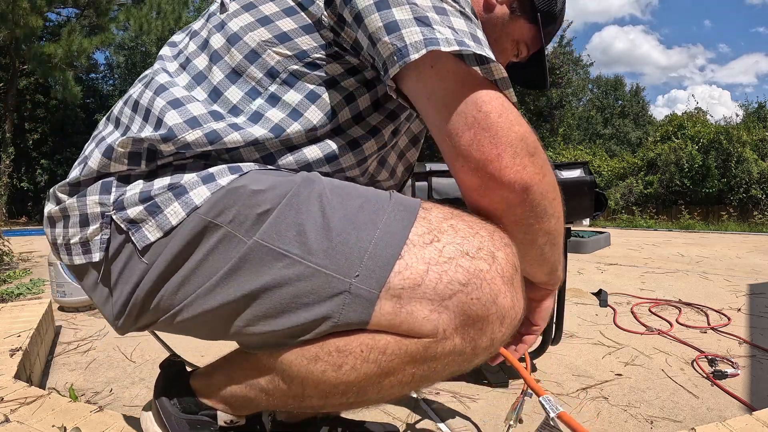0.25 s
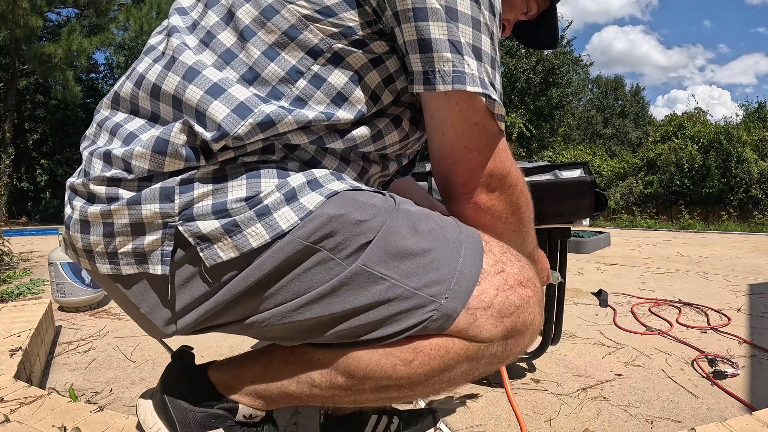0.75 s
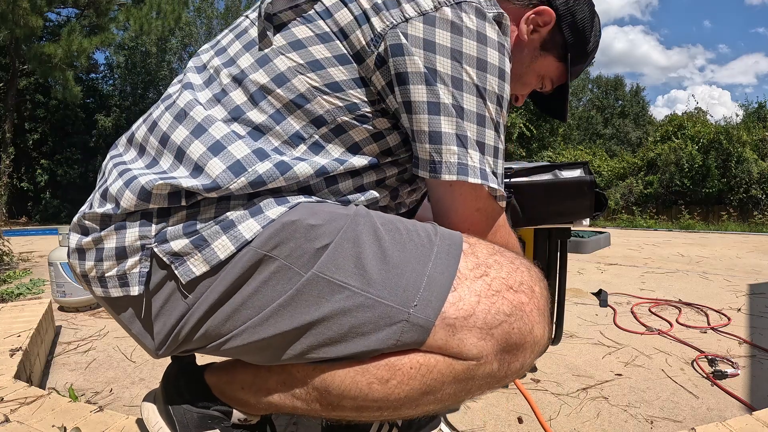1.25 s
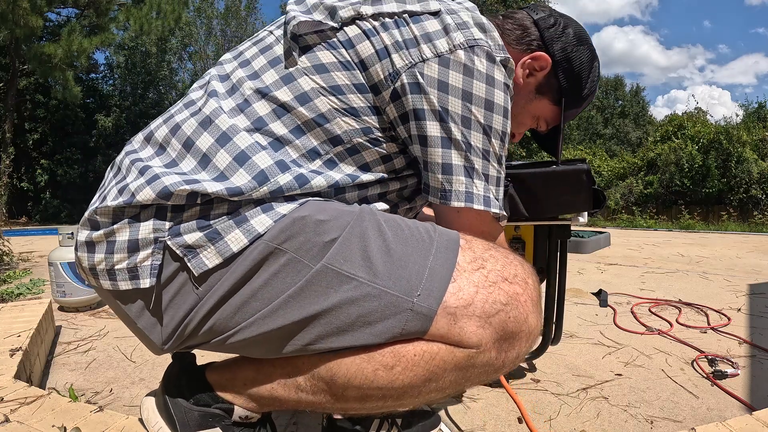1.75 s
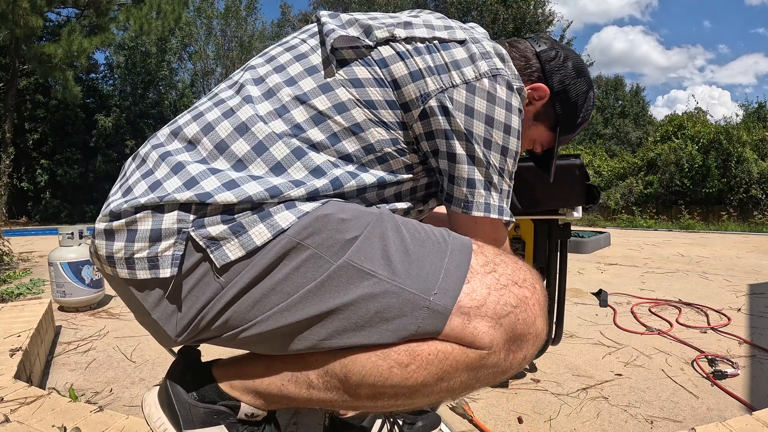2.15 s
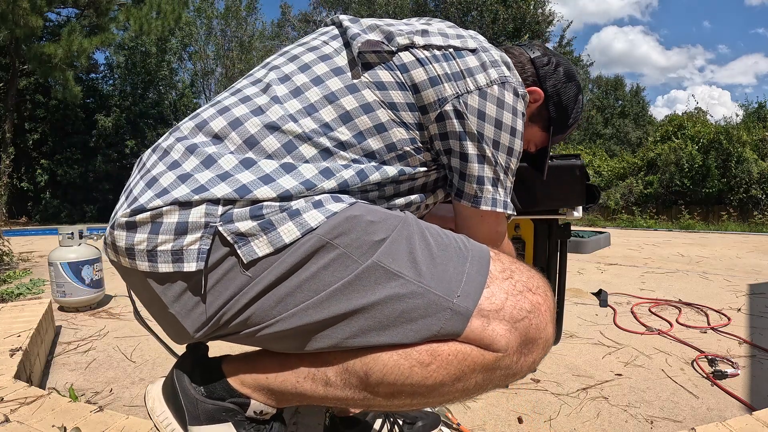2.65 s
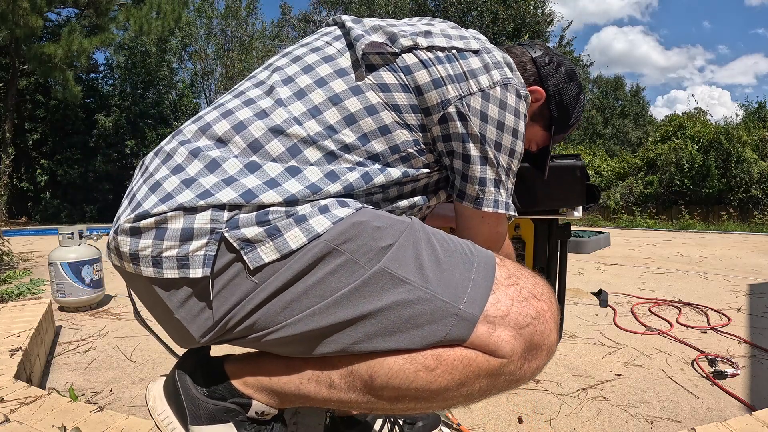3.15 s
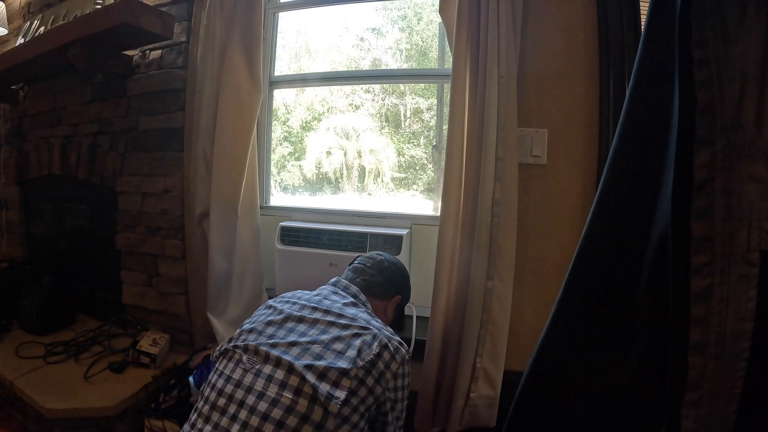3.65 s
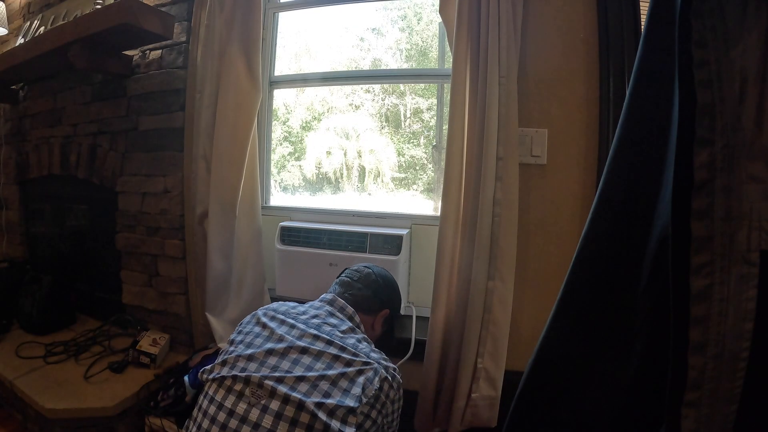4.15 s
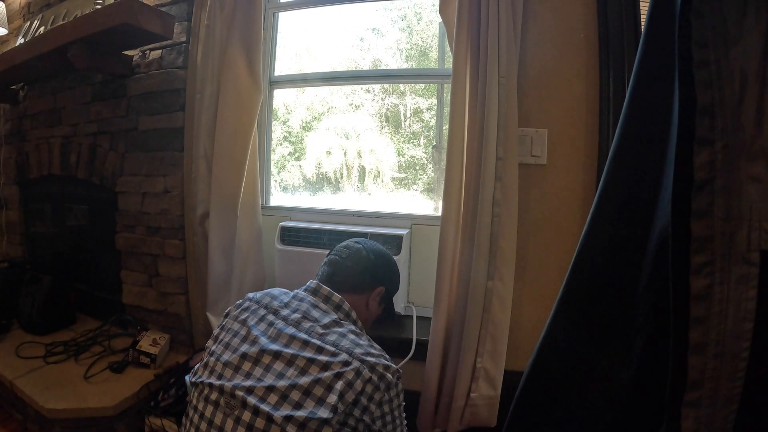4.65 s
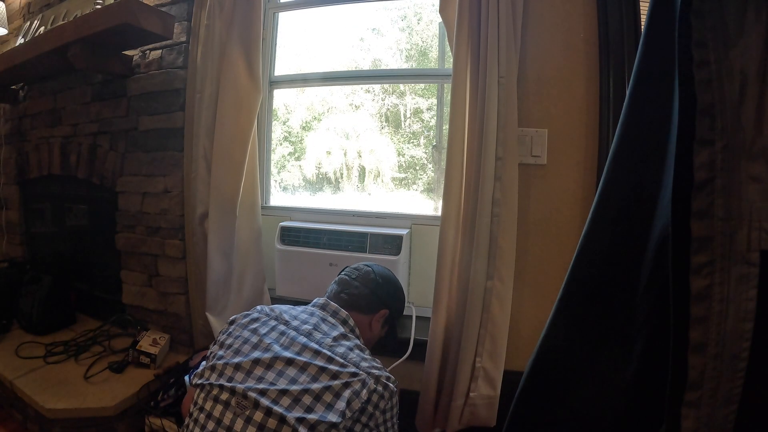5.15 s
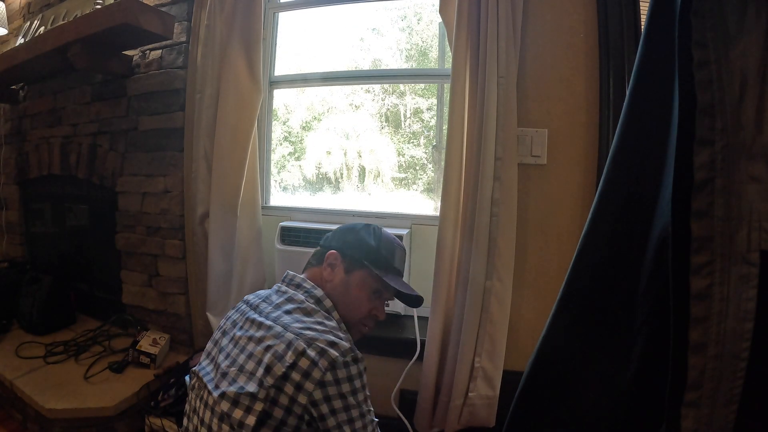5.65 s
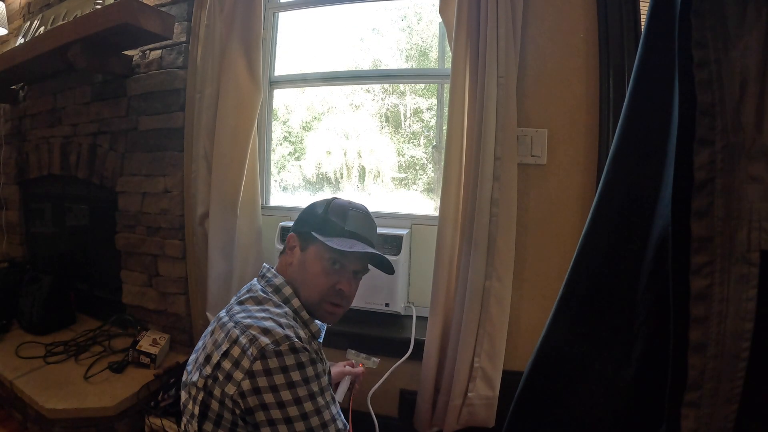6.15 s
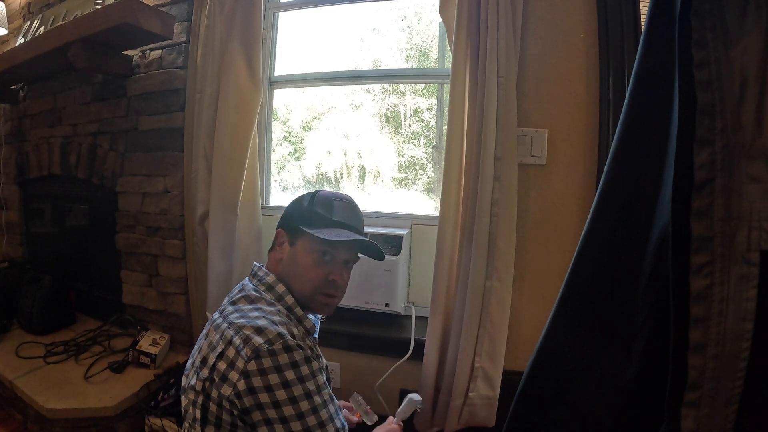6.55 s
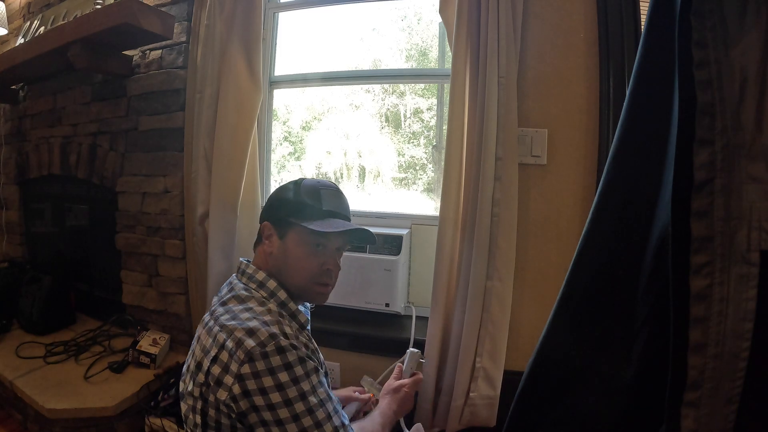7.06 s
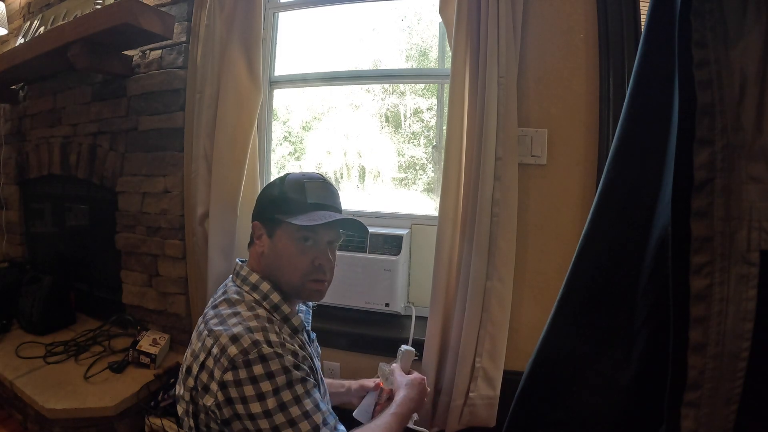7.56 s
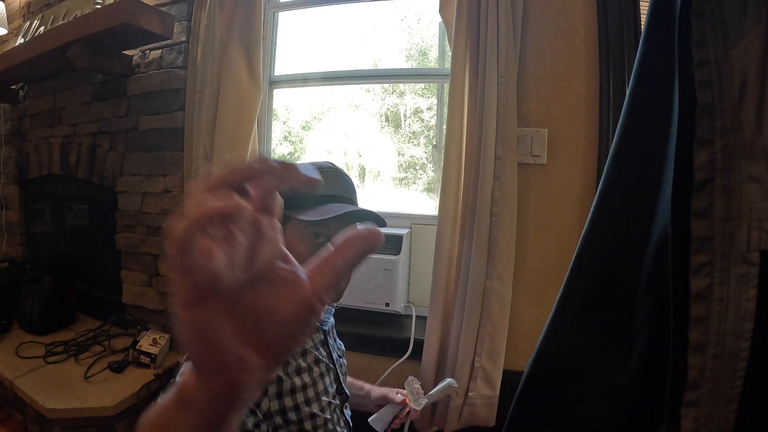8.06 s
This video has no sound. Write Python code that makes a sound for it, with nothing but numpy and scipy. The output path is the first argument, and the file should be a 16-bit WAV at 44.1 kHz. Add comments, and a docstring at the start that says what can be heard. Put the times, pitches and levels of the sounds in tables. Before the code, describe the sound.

Outdoors on a concrete patio, a single-cylinder generator runs steadily at arm's length, a loud, bright, rattling roar over a fast low exhaust throb. After three seconds it cuts off. Following a tiny gap, the same engine drones dully and much quieter through a window, while a plug and cable knock and drag on the floor, then small plastic ticks and faint cloth rustles. A small camera's close stereo microphones hear it.

```python
"""First a single-cylinder four-stroke generator runs steadily at arm's length on a concrete patio: waves at
multiples of its firing rate make the exhaust note, and noise rung through resonances makes the roar.
After a short gap it is heard from indoors through a window, duller and quieter. A plug and cable knock (fading
tones and noise) and drag (lumpy noise) on the floor; plastic ticks (noise bursts) and cloth rustles (grainy
treble). A small camera with two close microphone ports listens."""
import sys
import numpy as np
from scipy import signal
from scipy.fft import rfft, irfft
from scipy.io import wavfile
from scipy.ndimage import uniform_filter1d

SR = 44100
rng = np.random.default_rng(int(sys.argv[2]) if len(sys.argv) > 2 else 0)


def put_to_file(sound):
    """Save the sound as 16-bit audio at rate SR, in the file named by the first command-line argument."""
    columns = np.atleast_2d(sound).T  # one column per channel
    safe = np.clip(columns, -1, 1)
    whole_steps = np.round(safe * 32767)
    wavfile.write(sys.argv[1], SR, whole_steps.astype(np.int16))


N = 365588
TIME = np.arange(N) / SR  # s
BINS = np.arange(N // 2 + 1) * SR / N + 1e-3  # Hz, just above zero so that its logarithm exists


# engine speed on the patio: (time [s], firing rate [firings per s])
PATIO_SPEED = [(0.32, 30.58), (0.72, 30.55), (1.12, 30.5), (1.52, 30.49), (1.92, 30.55), (2.32, 30.68),
               (2.72, 30.61)]
# exhaust note, one row for each multiple 1, 2, 3, .. of the firing rate: (level [dB])
PATIO_NOTE = [-6, -0.5, -12, 1, 2.5, -30, 3, -0.5, -11.5, -9.5, -24, -9.5, -10, -18.5, -22, -16.5, -11.5,
              -50, -53, -18, -16.5, -12, -8, -16, -32, -26, -16, -25.5, -49, -17, -21.5, -48, -46, -16.5,
              -38, -22, -24.5, -27.5, -41, -18, -47, -52, -49, -30, -47, -19.5]
# thin panels that sing when a multiple meets them: (pitch [Hz], width [Hz], boost [dB])
PATIO_WHINES = [(1344.8, 4.4, 19.7)]
# tone of the roar of gas, cooling fan and shaking metal: (frequency [Hz], level [dB])
PATIO_ROAR = [(8, -39.5), (30, -13), (150, -4), (350, -0.5), (900, -14), (2400, -15), (4000, -19.5),
              (8000, -27.5), (11500, -34.5), (14500, -49.5)]
# frame, tank and muffler resonances in the roar: (pitch [Hz], width [Hz], boost [dB])
PATIO_PANELS = [(415, 126, 3), (714, 62, 9), (1064, 330, 11), (1415, 98, 6.5), (1910, 200, 7.5),
                (2740, 380, 6.5), (3550, 150, 2), (5170, 460, 5), (7230, 920, 5.5)]
# strength of the left-right difference: (frequency [Hz], level [dB])
PATIO_SIDE = [(60, -47), (110, -42), (200, -20), (370, -23), (600, -5), (800, -4.5), (1260, -6.5),
              (2320, -6.5), (4270, -6.5), (8500, -11), (12000, -2)]
# balance between the ports: (frequency [Hz], left minus right [dB])
PATIO_BALANCE = [(250, 0), (690, 0), (1260, -3), (2320, -1.5), (4270, 0), (7850, -0.5), (14400, 3.5)]


def engine_near():
    """The generator beside the camera: two pulses per cycle and a roar, both close and bright."""
    speed = curve(PATIO_SPEED)
    turns = np.cumsum(speed) / SR
    note = exhaust(turns + 0.557, PATIO_NOTE, angle=-0.68, sweep=0.02005, second=1.16, gap=0.238,
                   waver_db=2.5, smear=0.85, firm=16.6, sings=singing(speed, PATIO_WHINES))
    noise = roar(turns - 0.23, PATIO_ROAR, PATIO_PANELS, throb_db=0.4, puff_db=2.0, grain_db=2.5, gear_db=-6.5)
    both = undb(-21.5) * note + undb(-10.5) * noise
    return ports(both, PATIO_SIDE, lead=-0.15, scatter_s=0.75, left=PATIO_BALANCE)


# engine speed heard indoors: (time [s], firing rate [firings per s])
ROOM_SPEED = [(3.66, 30.82), (4.06, 30.78), (4.46, 30.85), (4.86, 30.85), (5.26, 30.77), (5.66, 30.62),
              (6.06, 30.54), (6.46, 30.72), (6.86, 30.85), (7.26, 30.72), (7.5, 30.69), (8.0, 30.83)]
# exhaust note, one row for each multiple 1, 2, 3, .. of the firing rate: (level [dB])
ROOM_NOTE = [0, -17, -8, 0, 1.5, -24.5, -6.5, -19, -15, -17.5, -15, -16, -32, -46, -25.5, -16.5, -51, -38,
             -41, -26, -52, -23, -44, -22.5, -23, -34, -24.5, -42, -43, -23.5, -24, -38, -29.5, -51, -31,
             -24, -29, -41, -27, -20]
# narrow resonances of the room (near 340 Hz) and of panels that sing when a multiple meets them: (pitch [Hz],
# width [Hz], boost [dB])
ROOM_WHINES = [(339.9, 4.2, 9.6), (758, 6.4, 31), (1211, 8.1, 11)]
# tone of the roar through wall and window: (frequency [Hz], level [dB])
ROOM_ROAR = [(8, -27), (22, -5), (30, -1), (60, 3), (130, -16.5), (330, -5), (600, -12.5), (1300, -16),
             (2500, -26.5), (4000, -36.5), (8000, -45), (11000, -56.5), (13000, -58), (13900, -67)]
# resonances in the roar: (pitch [Hz], width [Hz], boost, or cut if negative [dB])
ROOM_PANELS = [(513, 29, -9), (780, 45, 3), (943, 19, 7.5), (1220, 42, 8), (2010, 88, 3.5),
               (2720, 170, 1.5), (12400, 740, 4)]
# gain of the roar: (time [s], level [dB])
ROOM_ROAR_GAIN = [(3.4, -22), (4.8, -23), (6.2, -22.5), (7.2, -22), (8.2, -20.5)]
# strength of the left-right difference, also for the handling sounds: (frequency [Hz], level [dB])
ROOM_SIDE = [(110, -76), (200, -44), (370, -6), (690, 4.5), (1260, 8), (2320, 10.5), (4270, 11.5),
             (7850, 10), (14400, -1)]


def engine_far():
    """The generator through wall and window: one pulse per firing and a duller, quieter roar."""
    speed = curve(ROOM_SPEED)
    turns = np.cumsum(speed) / SR
    note = exhaust(turns + 0.041, ROOM_NOTE, angle=4.21, sweep=0.02524, second=0, gap=0,
                   waver_db=1.35, smear=0.68, firm=11.4, sings=singing(speed, ROOM_WHINES))
    noise = roar(turns - 0.25, ROOM_ROAR, ROOM_PANELS, throb_db=0.4, puff_db=-1.5, grain_db=0.0, gear_db=-4.5)
    both = undb(-36.5) * note + undb(curve(ROOM_ROAR_GAIN)) * noise
    return ports(both, ROOM_SIDE, lead=0.05, scatter_s=0.55)


def exhaust(turns, note, angle, sweep, second, gap, waver_db, smear, firm, sings):
    """A pulse per firing, highs first, and a duller second pulse a share of the cycle later."""
    out = 0
    stroke = wander(30.0, lambda v: undb(0.24 * v))  # the whole note varies a little
    for k, level_db in enumerate(note, 1):
        loose = min((k / firm) ** 2, 1)  # high multiples waver more
        gain = wander(5.0, lambda v: undb(level_db + waver_db * loose * v))
        second_gain = second / (1 + (k / 17.0) ** 4)  # fades above multiple 17
        pair = np.angle(1 + second_gain * np.exp(-2j * np.pi * k * gap))  # only the phase is used
        phase = 2 * np.pi * k * turns + angle + sweep * k ** 2 + pair
        phase = phase + smear * loose * wander(2.977)
        out = out + gain * sings(k) * np.cos(phase)
    return stroke * out


def singing(speed, whines):
    """A multiple grows louder while its pitch is inside a narrow resonance."""
    def gain(k):
        pitch, reach = k * speed, speed.mean() / 2
        # only the multiple nearest to a resonance makes it sing
        return undb(sum(db / (1 + (2 * (pitch - hz) / width) ** 2) for hz, width, db in whines
                        if abs(pitch.mean() - hz) < reach))
    return gain


def roar(turns, tone, panels, throb_db, puff_db, grain_db, gear_db):
    """Noise rung through panels: it throbs once a cycle, most in the treble, which the valves make gritty."""
    beat = np.cos(2 * np.pi * turns)
    steady = rng.standard_normal(N) * undb(throb_db * beat + 0.27 * wander(9.0) + 0.64 * wander(180.0))
    rattle = rng.standard_normal(N) * undb(puff_db * beat + grain_db * wander(250.0) + 0.5 * wander(13.0))
    # cam, gears and valves clatter in the same pattern on every cycle
    pattern = rng.standard_normal(720)
    gears = np.interp(turns, np.arange(len(pattern)) / len(pattern), pattern, period=1)
    gears = gears * undb(gear_db + 1.3 * wander(20.0))
    middle = rfft(steady) + rfft(gears) / (1 + (1400 / BINS) ** 8)
    # the rattle takes over above about 5500 Hz
    treble = 1 / (1 + (5500 / BINS) ** 4)
    mix = middle * np.sqrt(1 - treble) + rfft(rattle / rattle.std()) * np.sqrt(treble)
    ring_db = sum(db / (1 + (2 * (BINS - hz) / width) ** 2) for hz, width, db in panels)
    rung = irfft(mix * undb(ring_db), N)
    return colour(sway(rung, panels, sway_db=1.0, drift=0.025), tone)


def sway(x, panels, sway_db, drift):
    """Each panel swells and slides in pitch a little on its own as the frame shakes."""
    bins, times, frames = signal.stft(x, SR, nperseg=2048)
    at = np.minimum((times * SR).astype(int), N - 1)
    db = 0
    for hz, width, _ in panels:
        swell = sway_db * wander(14.0)[at]
        centre = hz * (1 + drift * wander(2.4)[at])
        db = db + swell / (1 + (2 * (bins[:, None] - centre) / width) ** 2)
    return signal.istft(frames * undb(db), SR, nperseg=2048)[1][:N]


# plug and cable knocks on the floor; ring and ping levels are against the thump:
# (time [s], blow level [dB], thump pitch [Hz], ring level [dB], ping pitch [Hz], ping level [dB])
FLOOR_KNOCKS = [(3.463, -37.5, 328, 9, 3200, -25), (4.031, -24.5, 380, -14, 730, -16),
                (4.054, -21.5, 388, -13, 1130, -5), (4.081, -32, 300, -12, 813, -14),
                (4.122, -30, 550, 3, 2950, -16), (4.155, -25, 344, -7, 1150, -7),
                (4.189, -17.5, 345, -7, 3500, -23), (4.218, -18, 400, -20, 800, -18),
                (4.238, -22, 443, -18, 780, -14), (4.28, -29, 388, -12, 1010, -14),
                (4.308, -36, 326, -19, 711, -14), (4.719, -29, 380, -7, 790, -10),
                (5.124, -35.5, 380, 12, 3180, -4), (5.273, -33, 336, -14, 470, -10),
                (5.328, -27, 350, -9, 480, -8), (5.356, -35, 231, 6.5, 1250, -7),
                (6.559, -28, 302, 12.5, 2720, -15), (6.564, -16, 239, -13, 1690, -17),
                (6.576, -27, 330, -3, 700, -8), (7.491, -27, 248, -9, 620, -3.5)]
# the plug's ring, before each blow varies it: (pitch [Hz], level [dB], time to fall 60 dB [s])
PLUG_MODES = [(890, 0, 0.022), (1255, -10, 0.016), (1610, -25, 0.016)]


def knocks():
    """A dull thump with a noisy tail, the plug's short ring, a bright ping and a rattling crack."""
    out, t = np.zeros(N), np.arange(4000) / SR
    tails, cracks = band(410.0, 380.0), band(950.0, 1230.0)
    # each blow lands on another spot, which changes the ring's loudness and pitch
    spots = rng.standard_normal((len(FLOOR_KNOCKS), len(PLUG_MODES), 2))
    for (s, blow_db, hz, ring_db, ping_hz, ping_db), spot in zip(FLOOR_KNOCKS, spots):
        now = slice(int(s * SR), int(s * SR) + len(t))
        thump = np.sin(2 * np.pi * hz * t) * undb(-60 * t / 0.049) * np.minimum(t / 0.0026, 1)
        tail = 0.33 * tails[now] * undb(-60 * t / 0.05)
        plug = 0
        for (mode_hz, db, t60), (louder, higher) in zip(PLUG_MODES, spot):
            fade = undb(ring_db + db + 1.2 * louder - 60 * t / t60)
            plug = plug + fade * np.sin(2 * np.pi * mode_hz * (1 + 0.015 * higher) * t)
        crack = cracks[now] * undb(ring_db - 11 - 60 * t / 0.035)
        ping = np.sin(2 * np.pi * ping_hz * t) * undb(ping_db - 60 * t / 0.021)
        onset = np.minimum(t / 0.0013, 1)
        out[now] += undb(blow_db) * (thump + tail + plug + crack + ping) * onset
    return out


# tugs on the cable: (time [s], length [s], rumble level [dB], scrape level against rumble [dB])
CABLE_TUGS = [(4.02, 0.13, -40, -3.5), (4.168, 0.17, -39.5, -17), (5.013, 0.35, -42, -9.5),
              (6.552, 0.07, -42.5, 0)]


def drags():
    """The cable judders over the floor: low noise in uneven lumps, with a rough scrape above."""
    lumps = undb(3.2 * wander(70.0))
    rumble = lumps * band(333.0, 196.0)
    scrape = lumps * undb(1.6 * wander(90.0)) * band(530.0, 1150.0)
    out = 0
    for s, length, level_db, scrape_db in CABLE_TUGS:
        tug = gesture(s, length, level_db, attack_s=0.015, t60_s=1)
        out = out + tug * (rumble + undb(scrape_db) * scrape)
    return out


# small dry ticks of plastic; the top is the noise near 11.5 kHz, against the main band:
# (time [s], level [dB], main band [Hz], top level [dB])
PLASTIC_TICKS = [(5.3694, -62, 6000, -13), (5.5794, -58, 6000, -11), (5.9374, -57.5, 6000, -23),
                 (5.9844, -59.5, 7500, -16), (6.0072, -54, 6500, -10), (6.2307, -57.5, 4500, -17),
                 (6.2507, -59, 8000, -9), (6.3165, -57, 7000, -19), (6.3344, -52, 4000, -25),
                 (6.444, -54, 6960, -29), (6.5585, -45, 4000, -33), (6.7035, -44, 5800, -23),
                 (7.182, -55, 7000, -22)]


def ticks():
    """Each tick is a 20 ms burst of fading noise, about an octave wide, with some very high noise."""
    out, t = np.zeros(N), np.arange(900) / SR
    bursts, high = rng.standard_normal((len(PLASTIC_TICKS), len(t))), band(11500.0, 2500.0)
    for (s, level_db, hz, top_db), burst in zip(PLASTIC_TICKS, bursts):
        now = slice(int(s * SR), int(s * SR) + len(t))
        octave = signal.butter(2, [hz / 1.8, hz * 1.23], "band", fs=SR, output="sos")
        low = signal.sosfilt(octave, burst)
        out[now] += undb(level_db - 60 * t / 0.034) * (low / low.std() + undb(top_db) * high[now])
    return out


# cloth movements: (time [s], length [s], level [dB])
CLOTH_MOVES = [(4.128, 0.1, -62), (7.95, 0.18, -62.5), (8.14, 0.15, -60.5)]


def rustle():
    """Cloth rustles as soft treble noise whose level flickers in fine grains."""
    moving = sum(gesture(*row, attack_s=0.14, t60_s=0.3) for row in CLOTH_MOVES)
    grain = undb(1.9 * wander(90.0) + 1.6 * wander(25.0))
    return moving * grain * (band(4800.0, 3800.0) + 0.14 * band(12000.0, 1500.0))


def ports(mid, side, lead, scatter_s, left=((1, 0), (2, 0))):
    """Left and right from one sound: direction sets balance and lead, reflections scatter the rest."""
    t = np.arange(SR) / SR
    echoes = rfft(rng.standard_normal(SR) * undb(-60 * t / scatter_s), N)
    gain = undb(over_bins(left))
    balance = (gain - 1) / (gain + 1)
    # reflections part the two ports above about 500 Hz
    scatter = 0.78 * echoes / np.abs(echoes) / np.sqrt(1 + (500.0 / BINS) ** 2)
    spread = balance + undb(over_bins(side)) * (1j * lead + scatter)
    wide = irfft(rfft(mid) * spread, N)
    return np.array([mid + wide, mid - wide])


def gesture(start_s, length_s, level_db, attack_s, t60_s):
    """A movement's loudness: a straight rise, a hold, and a fade that begins length_s after the start."""
    fade_time = np.maximum(TIME - start_s - length_s, 0)
    return ramp(start_s, attack_s) * undb(level_db - 60 * fade_time / t60_s)


def wander(rate, shape=lambda v: v):
    """Random levels held 1 / rate s and smoothed twice, spread near 1, then passed through shape."""
    step = 32  # samples between computed points
    k, count = max(int(SR / step / rate), 1), N // step + 2
    held = np.repeat(rng.standard_normal(count // k + 1), k)[:count]
    smooth = uniform_filter1d(uniform_filter1d(held, k), k)
    return np.interp(np.arange(N), step * np.arange(count), shape(1.18 * smooth))


def band(hz, width):
    """Noise of rms 1 around a centre frequency."""
    x = irfft(rfft(rng.standard_normal(N)) / (1 + ((BINS - hz) / width) ** 4), N)
    return x / x.std()


def colour(x, table):
    """Make each frequency louder or softer by (frequency [Hz], level [dB]) points."""
    return irfft(rfft(x) * undb(over_bins(table)), N)


def over_bins(table):
    """Read (frequency [Hz], value) points at every frequency, straight over log frequency."""
    hz, value = np.transpose(table)
    return np.interp(np.log(BINS), np.log(hz), value)


def curve(table):
    """Straight lines in time through (time [s], value) points."""
    table = np.asarray(table)
    return np.interp(TIME, table[:, 0], table[:, 1])


def ramp(start_s, rise_s):
    """0 before the start, 1 after the rise."""
    return np.clip((TIME - start_s) / rise_s, 0, 1)


def undb(db):
    """Turn a level in dB into a gain."""
    return 10 ** (np.asarray(db) / 20)


# left-right difference indoors, first narrow and then wider: (time [s], level [dB])
ROOM_WIDTH = [(4.9, -41), (5.8, -34), (6.15, -19.5), (6.6, -21)]


def scene():
    """The patio is cut off and the room fades in; a slight constant offset comes and goes with each."""
    offset = -0.0011
    handling = knocks() + drags() + ticks() + rustle()
    room = engine_far() + ports(handling, ROOM_SIDE, lead=0.05, scatter_s=0.03)
    middle = room.mean(axis=0)
    room = middle + undb(curve(ROOM_WIDTH)) * (room - middle)
    cut_s, fall_s = 3.229, 0.0098
    # a faint share of the patio lasts through the cut, then falls by 1000 dB per s
    tail = undb(-28.5 - 1000 * np.maximum(TIME - cut_s - fall_s, 0))
    patio_gain = 1 - ramp(cut_s, fall_s) + tail
    room_gain = ramp(3.285, 0.081)
    return patio_gain * (engine_near() + offset) + room_gain * (room + offset)


def record(dry):
    """The camera cuts the top above 14900 Hz with a steep filter."""
    return signal.sosfilt(signal.ellip(12, 0.2, 80, 14900, fs=SR, output="sos"), dry)


dry = scene()
out = record(dry)
put_to_file(out)
```